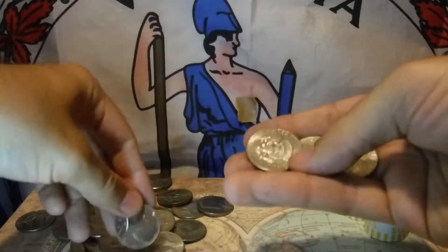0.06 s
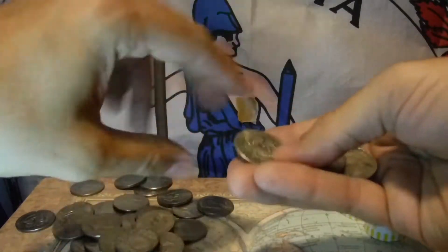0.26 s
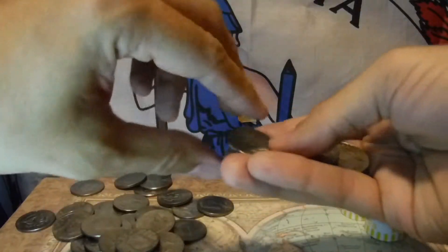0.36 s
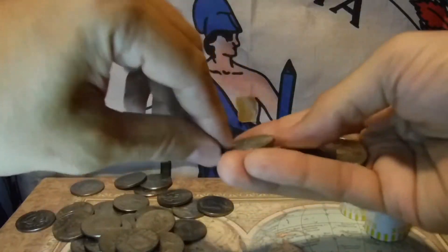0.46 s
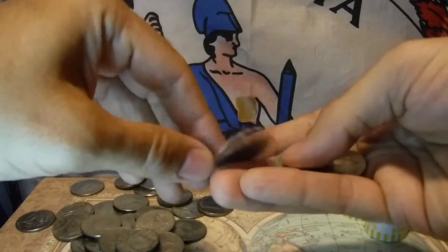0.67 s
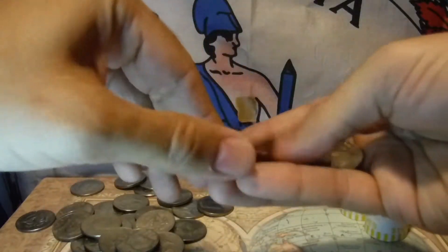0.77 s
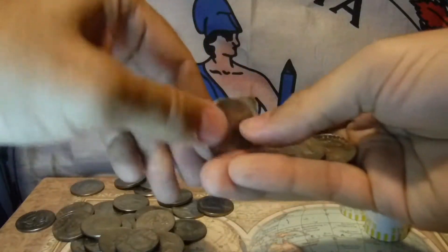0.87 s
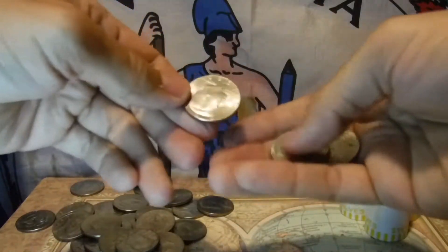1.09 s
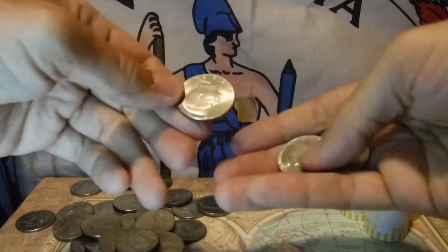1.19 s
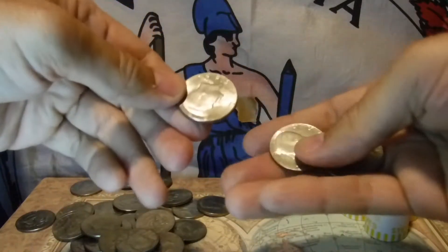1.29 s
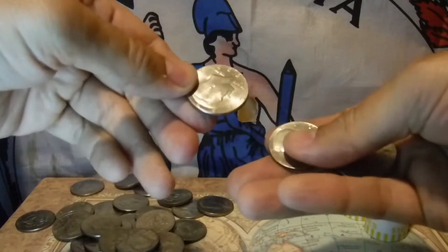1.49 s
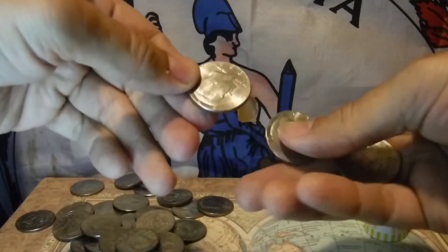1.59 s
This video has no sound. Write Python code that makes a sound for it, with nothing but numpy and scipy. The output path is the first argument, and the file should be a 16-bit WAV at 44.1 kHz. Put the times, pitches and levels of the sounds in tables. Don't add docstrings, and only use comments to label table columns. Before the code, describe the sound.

Bright metallic clink as a coin hits other coins, with a quick rattle, light table thump and thin ringing cut short; later, held coins tick and slide, ending in a firm click. Close mono, quiet room, soft hiss.

```python
import sys
import numpy as np
from scipy import signal
from scipy.fft import rfft, irfft
from scipy.io import wavfile

SR = 44100
rng = np.random.default_rng(int(sys.argv[2]) if len(sys.argv) > 2 else 0)


def invert_db(level):
    return 10 ** (np.asarray(level, dtype=float) / 20)


def wrap_up_sound(samples):
    columns = np.atleast_2d(samples).T
    tamed = np.clip(columns, -1, 1)
    steps = np.round(tamed * 32767).astype(np.int16)
    wavfile.write(sys.argv[1], SR, steps)


N = 72765


def fade(t60_s, count):
    t = np.arange(count) / SR
    return t, np.exp(-np.log(1000) * t / t60_s)


def ring(hz, db, t60_s):
    hz, db, t60_s = [np.reshape(v, (-1, 1)) for v in (hz, db, t60_s)]
    t, env = fade(np.clip(t60_s, .002, 2), count=12000)
    return (invert_db(db) * env * np.sin(2 * np.pi * hz * t)).sum(axis=0)


def add(out, start_s, x):
    i = int(start_s * SR)
    out[i:i + len(x)] += x[:N - i]


def band(x, lo_hz, hi_hz):
    sos = signal.butter(2, [lo_hz, min(hi_hz, SR / 2.2)], "bandpass", fs=SR, output="sos")
    return signal.sosfilt(sos, x)


def colour(points, count):
    hz, db = np.transpose(points)
    f = np.fft.rfftfreq(count, 1 / SR) + 1
    gain = invert_db(np.interp(np.log(f), np.log(hz), db))
    x = irfft(rfft(rng.standard_normal(count)) * gain, count)
    return x / x.std()


def grit(rate_per_s, count):
    hit = rng.random(count) < rate_per_s / SR
    size_db = 4 * rng.exponential(size=count).clip(0, 3)
    x = hit * invert_db(size_db) * np.sign(rng.standard_normal(count))
    return x / x.std()


def rise(x, rise_s):
    return x * np.clip(np.arange(len(x)) / SR / rise_s, 0, 1) ** 2


def choke(x, held_s):
    late_s = np.clip(np.arange(len(x)) / SR - held_s, 0, None)
    return x * invert_db(-60 * late_s / .01)


def room(x, db, t60_s):
    top_hz, gap_s, treble_life = 3550, 0.0037, 0.67
    t, env = fade(t60_s, count=22050)
    tail = band(rng.standard_normal(len(t)), 95, top_hz) * env
    tail = tail + band(rng.standard_normal(len(t)), top_hz, SR) * env ** (1 / treble_life)
    tail = tail * np.clip(t / gap_s, 0, 1)
    return x + invert_db(db) * signal.fftconvolve(x, tail / np.linalg.norm(tail))[:N]


# (frequency [Hz], density [dB per Hz])
HUM_SPECTRUM = [(40, 6.5), (54, 1), (88, -0.5), (120, -7), (240, -10.5), (1290, -19), (1840, -22),
                (16000, -30)]


def hum():
    fan_hz, fan_width_hz, tone_hz, mic_low_hz = 1342, 440, 157.7, 31
    fan = band(rng.standard_normal(N), fan_hz - fan_width_hz / 2, fan_hz + fan_width_hz / 2)
    tone = band(rng.standard_normal(N), tone_hz - 6, tone_hz + 6)
    floor = band(band(colour(HUM_SPECTRUM, count=N), mic_low_hz, SR), mic_low_hz, SR)
    return invert_db(-50.5) * floor + invert_db(-62) * fan / fan.std() + invert_db(-62) * tone / tone.std()


# (start [s], length [s], level [dB], centre [Hz], width [Hz])
SLIDES = [(0.024, 0.06, -56.5, 3850, 2300), (0.04, 0.038, -59.5, 5900, 1600),
          (0.046, 0.031, -63, 7100, 403), (.045, .033, -68, 12700, 500), (.534, 0.012, -50.5, 6000, 2400),
          (0.037, .04, -58.5, 2500, 900), (1.279, 0.074, -47, 3900, 840), (1.29, 0.054, -54, 2960, 990),
          (1.339, 0.014, -44, 4500, 1900), (1.36, 0.015, -45, 4500, 710), (1.296, 0.038, -45, 5600, 1300),
          (1.298, 0.032, -54, 12300, 1500), (1.3, 0.012, -37.5, 7500, 320), (1.313, .016, -54, 6700, 900),
          (1.334, 0.028, -56, 8200, 1500), (1.372, 0.022, -36.5, 4300, 620),
          (1.367, 0.042, -49, 5900, 2600), (1.369, 0.02, -52, 8900, 1200)]


def slides():
    out = np.zeros(N)
    for start_s, length_s, db, hz, width_hz in SLIDES:
        x = band(grit(4700, count=4096), hz - width_hz / 2, hz + width_hz / 2)
        progress = np.clip(np.arange(len(x)) / SR / length_s, 0, 1)
        stroke = np.sin(np.pi * progress).clip(0) ** .5
        add(out, start_s, invert_db(db) * x / x.std() * stroke)
    return out


# (time [s], level [dB], partial [Hz], t60 [s], click level [dB])
HAND_TICKS = [(0.02, -47.5, 3870, 0.0089, -51), (0.044, -37, 6240, 0.013, -52),
              (0.0434, -46, 4000, .012, -60), (0.043, -47, 8150, .012, -60), (.050, -45, 4000, .014, -52),
              (.0525, -50, 5500, .01, -54), (.056, -48, 8100, .014, -53), (.0598, -46, 5300, .01, -52),
              (.060, -47, 8100, .014, -60), (.0645, -48, 6200, .012, -50), (.071, -51, 8100, .014, -50),
              (.5337, -33.5, 7070, 0.034, -45), (0.5328, -35, 12300, 0.022, -56),
              (.534, -34, 6130, 0.01, -40), (0.538, -47, 8850, 0.013, -39), (.5368, -38.5, 12300, .03, -60),
              (0.536, -54.5, 4300, 0.01, -59), (0.541, -45.5, 7160, 0.018, -46.5),
              (0.544, -42, 12150, 0.016, -53), (.548, -51, 5930, 0.035, -58.5),
              (.589, -57.5, 8770, 0.038, -66.5), (.877, -51.5, 7300, 0.013, -44.5),
              (1.135, -59.5, 7900, 0.038, -66), (1.2022, -46.5, 8130, 0.025, -44),
              (1.202, -49, 3870, 0.017, -62.5),
              (1.261, -47.5, 3830, 0.02, -47), (1.278, -37, 8200, 0.015, -36),
              (1.278, -41, 4420, .012, -60), (1.287, -37, 8350, 0.014, -46),
              (1.295, -27.5, 7140, 0.013, -30.5), (1.295, -33, 10700, 0.011, -37),
              (1.296, -34, 11700, .01, -58), (1.3015, -38, 10000, 0.01, -35),
              (1.309, -37, 10150, 0.0098, -44), (1.3153, -37, 5570, 0.015, -37),
              (1.3153, -38, 7300, .015, -60), (1.3153, -42, 10300, .012, -60),
              (1.322, -34, 5160, 0.012, -46), (1.3354, -28.5, 5660, 0.01, -38),
              (1.3358, -32.5, 8200, 0.011, -57), (1.339, -24, 4220, 0.012, -38),
              (1.339, -39, 8450, .01, -59), (1.347, -31, 4200, 0.012, -33.5),
              (1.351, -36.5, 4220, 0.014, -53), (1.390, -13.5, 5000, 0.0069, -26.5),
              (1.392, -17, 4485, 0.011, -31), (1.390, -21.5, 7800, 0.0086, -49),
              (1.3903, -28.5, 12370, 0.012, -44), (1.397, -45, 12250, 0.035, -60),
              (1.392, -32.5, 2480, 0.0067, -53.5)]


def ticks():
    spread, side_db, side_life, rise_s = 0.048, -7.5, 0.64, .0008
    out = np.zeros(N)
    for s, db, hz, t60_s, click_db in HAND_TICKS:
        side_hz = hz * (1 + spread * rng.uniform(-1.01, 1, size=4))
        tone = ring(hz, db, t60_s) + ring(side_hz, db + side_db, side_life * t60_s)
        t, env = fade(0.01, count=1024)
        click = rng.standard_normal(len(t)) * env
        click = band(band(click, 3700, 11400), 3700, 11400)
        add(out, s - rise_s / 2, rise(tone, rise_s))
        add(out, s, invert_db(click_db) * click)
    return out


# (frequency [Hz], level at first spot [dB], level at second spot [dB], t60 [s])
BOARD_MODES = [(175, -12.5, -11.5, 0.044), (217, -0.5, 0.5, 0.066), (273.5, -2, -3.5, 0.1),
               (480, -11, -12, 0.066), (656, -13, -17.5, .04), (758, -2.5, -14, 0.086),
               (919, -12.5, -10.5, .09), (1090, -12.5, -5.5, 0.059), (1417, -7, -14.5, 0.04),
               (1570, -1, -7.5, 0.038), (1770, -17, -9, 0.049), (1970, -12, -2, 0.032),
               (2203, -13.5, -11.5, 0.039)]
# (time [s], level [dB], bass modes relative [dB])
BLOWS = [
    (.127, -23, 0.5),
    (.147, -33.5, -7.5),
    (0.1816, -27.5, -2.5),
    (0.1862, -23.5, -1.5),
    (.205, -39.5, 3.5),
    (.222, -31, 1),
    (.238, -39, -6),
    (0.26, -51.5, 14.5),
    (0.282, -54.5, 11),
    (0.321, -47.5, 4),
]


def table():
    second_spot_s, bass_top_hz, detune, thud_hz = .17, 350, .01, 71.3
    out, thud, modes = np.zeros(N), np.zeros(N), np.array(BOARD_MODES)
    hz, t60_s = modes[:, 0], modes[:, 3]
    for s, db, bass_db in BLOWS:
        spot_db = modes[:, 2] if s > second_spot_s else modes[:, 1]
        mode_db = spot_db + db + bass_db * (hz < bass_top_hz) + 0.96 * rng.standard_normal(len(hz))
        add(out, s, ring(hz * (1 + detune * rng.standard_normal(len(hz))), mode_db, t60_s))
        add(thud, s, ring(thud_hz, db - 21, t60_s=0.42))
    return out, band(thud, thud_hz / 1.26, thud_hz * 1.3)


def singer():
    start_s, settle_s, stop_s, start_hz, settled_hz = 0.21, 0.31, .443, 7203, 7228
    t = np.clip(np.arange(N) / SR - start_s, 0, None)
    late = np.clip(t - (settle_s - start_s), 0, None)
    hz = start_hz + (settled_hz - start_hz) * np.clip(late / 0.095, 0, 1)
    db = -28 - 60 * (t - late) / 0.66 - 60 * late / 0.28
    db = db - 12 * np.clip((t + start_s - stop_s) / .01, 0, 1)
    return invert_db(db) * np.clip(t / 0.0045, 0, 1) * np.sin(2 * np.pi * np.cumsum(hz) / SR)


RING_RISE_S = 0.00046
# (time [s], frequency [Hz], level [dB], t60 [s])
FREE_RINGS = [(.128, 4597, -36, 0.15), (0.1266, 6099, -23.5, 0.033), (.1266, 5782, -27.5, 0.028),
              (.1275, 5400, -43, 0.045), (.146, 4600, -33, .06), (.1858, 8300, -22.5, 0.05),
              (.1858, 6744, -32, .06), (.198, 8204, -20, .04), (.198, 5600, -31.5, .04),
              (.226, 12330, -33, 0.1), (.255, 5090, -40, .15), (.216, 8594, -26.5, 0.048),
              (.223, 5900, -26, 0.044)]


def free_rings():
    out = np.zeros(N)
    for s, hz, db, t60_s in FREE_RINGS:
        add(out, s, ring(hz, db, t60_s))
    return out


# (time [s], frequency [Hz], level [dB], held [s])
HELD_MODES = [
    (.1272, 12190, -15, .005),
    (.1345, 12200, -23, .005),
    (.1405, 7214, -21, .005),
    (.146, 12225, -28, .034),
    (.186, 12519, -21, .019),
    (.186, 12190, -20, .009),
    (.1902, 7265, -14, .0045),
    (.1978, 7156, -11, .0052),
    (.198, 12095, -22, .012),
    (.2155, 12235, -21, .011),
]


def held_modes():
    out = np.zeros(N)
    for s, hz, db, held_s in HELD_MODES:
        add(out, s, choke(rise(ring(hz, db, t60_s=0.19), RING_RISE_S), held_s))
    return out


# (frequency [Hz], density [dB per Hz])
CRACK_SPECTRUM = [(300, 2), (1300, -1), (2900, -8), (4600, -5.5), (5800, 4.5), (6800, -3), (8200, -3.5),
                  (15800, -10.5)]
# (start [s], level [dB], t60 [s])
SHUFFLES = [
    (.127, -30.5, 0.27),
    (0.183, -25, 0.2),
    (.208, -29, 0.25),
]


def shuffles():
    out = np.zeros(N)
    tiny = colour(CRACK_SPECTRUM, count=512) * fade(0.0055, count=512)[1]
    for start_s, db, t60_s in SHUFFLES:
        clicks = signal.fftconvolve(grit(4500, count=12000), tiny / np.linalg.norm(tiny))
        add(out, start_s, invert_db(db) * clicks * fade(t60_s, count=len(clicks))[1])
    return out


def coin_modes(hz, db, t60_s):
    hz = np.array(hz) * (1 + .0007 * rng.standard_normal(len(hz)))
    return ring(hz, db + 4.5 * rng.standard_normal(len(hz)), t60_s)


LOW_HZ = [7156, 7274, 7356, 7500]
LOW_DB = [-1.5, -2.5, -3, -11]
HIGH_HZ = [12095, 12185, 12219, 12519, 12590, 12840]
HIGH_DB = [-3.5, -3, -0.5, -3.5, -12.5, -15.5]
# (time [s], crack [dB], low ring [dB], high ring [dB], undamped t60 [s])
CONTACTS = [(0.1265, -6.5, -37, -15.5, 0.053), (.1283, -13, -27.5, -35, 0.02), (.134, -21.5, -11, -28, .04),
            (0.139, -27, -28, -47, 0.05), (.146, -23, -38.5, -35.5, .2), (0.1814, -13.5, -24.5, -23, 0.034),
            (0.1859, -7.5, -30.5, -20.5, 0.044), (.1905, -14.5, -23.5, -20, 0.089),
            (.1978, -10, -14.5, -25, 0.1), (0.2023, -24, -24.5, -16.5, 0.041),
            (0.211, -31, -22, -23, 0.057), (.216, -16, -29.5, -28.5, 0.08), (.223, -24, -29, -28.5, 0.073),
            (.230, -14, -23.5, -30.5, .06), (0.238, -24, -24.5, -37, 0.087), (.250, -23.5, -36, -36, .07),
            (.266, -48, -46, -43, 0.056), (.285, -29.5, -49, -35, 0.041), (.299, -49, -42, -59, 0.036),
            (.322, -58, -58, -68, 0.045)]


def contacts():
    out = np.zeros(N)
    starts = [row[0] for row in CONTACTS]
    next_starts = starts[1:] + [starts[-1] + .015]
    for (s, crack_db, low_db, high_db, t60_s), next_s in zip(CONTACTS, next_starts):
        coin = coin_modes(LOW_HZ, np.array(LOW_DB) + low_db - 9.0, t60_s)
        coin = coin + coin_modes(HIGH_HZ, np.array(HIGH_DB) + high_db - 8.5, t60_s)
        add(out, s, choke(rise(coin, RING_RISE_S), next_s - s))
        neighbour_db = crack_db - 24.5 + 5 * rng.standard_normal(12)
        add(out, s, ring(rng.uniform(4100, 13960, size=12), neighbour_db, t60_s=0.014))
        crack = colour(CRACK_SPECTRUM, count=4096) * fade(0.022, count=4096)[1]
        add(out, s, invert_db(crack_db - 8) * crack)
    return out


def scene():
    pile_low_hz = 125
    board, thud = table()
    pile = contacts() + shuffles() + free_rings() + held_modes()
    drop = band(band(pile + board, pile_low_hz, SR), pile_low_hz, SR)
    hand = room(ticks() + slides(), db=-16.5, t60_s=0.12)
    return (room(drop, db=-11.5, t60_s=0.26) + singer() + thud + hand + hum())[None]


def roll_off(x):
    return signal.sosfilt(signal.butter(12, 16470, fs=SR, output="sos"), x)


def record(dry):
    mix = signal.sosfilt(signal.ellip(14, .3, 48, 15745, fs=SR, output="sos"), dry)
    return roll_off(mix)


dry = scene()
out = record(dry)
wrap_up_sound(out)
```